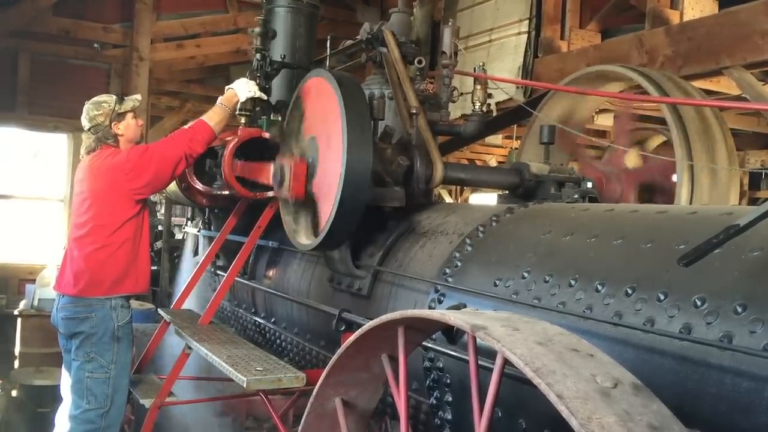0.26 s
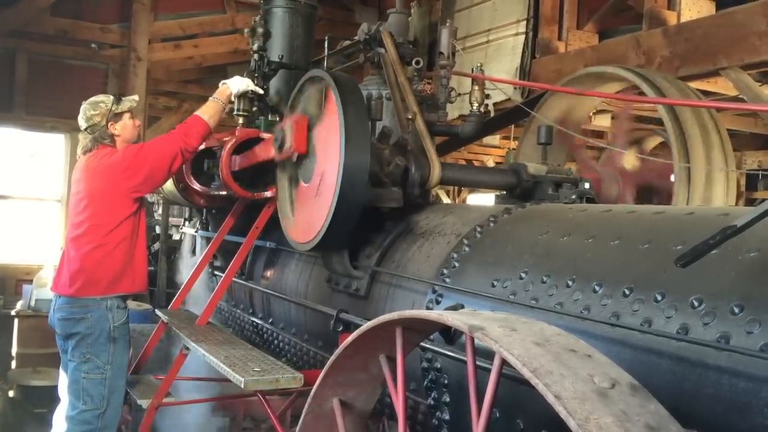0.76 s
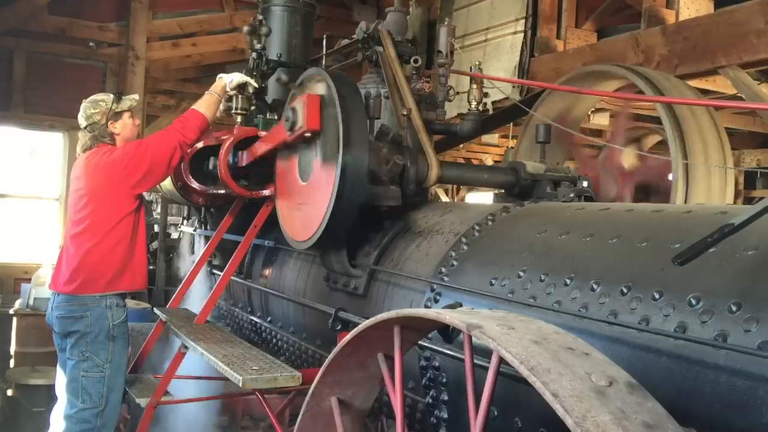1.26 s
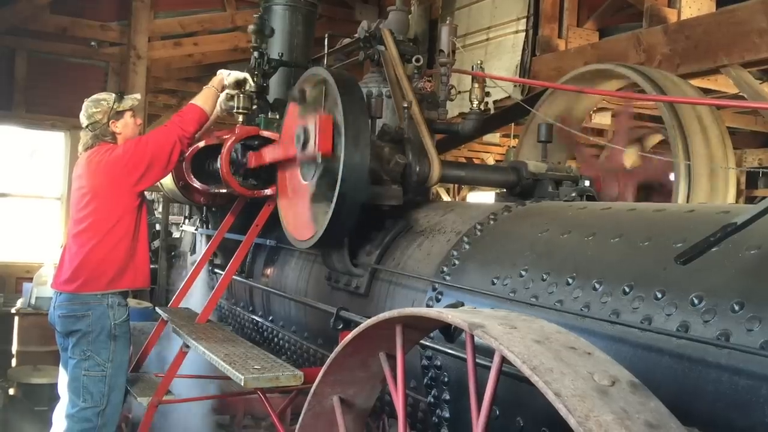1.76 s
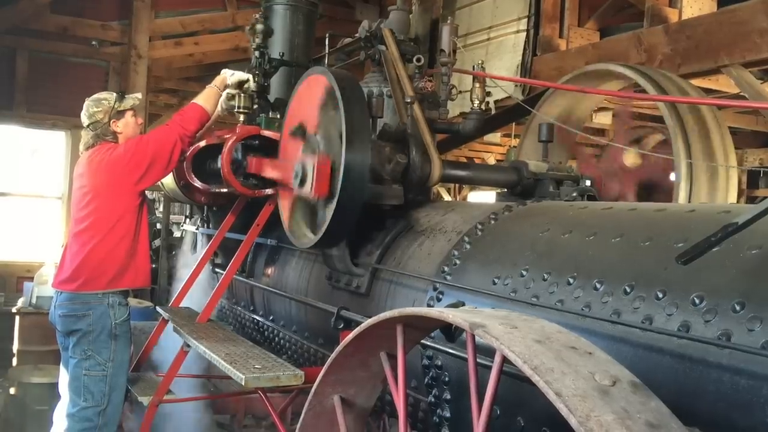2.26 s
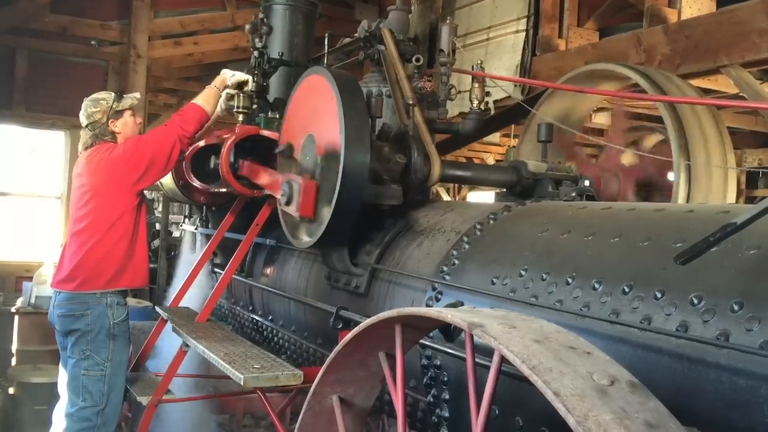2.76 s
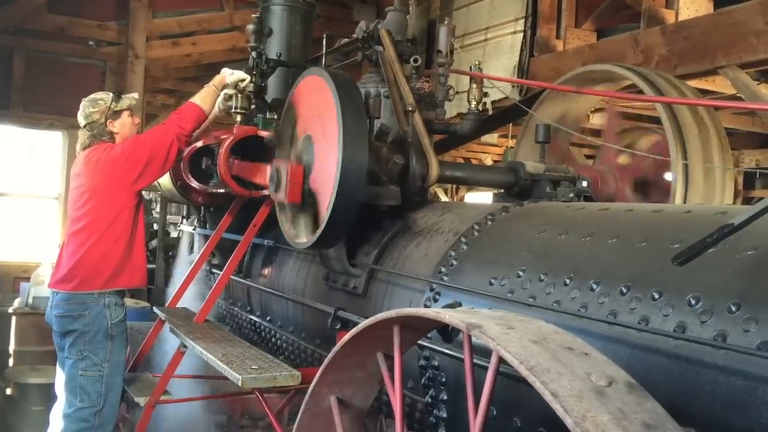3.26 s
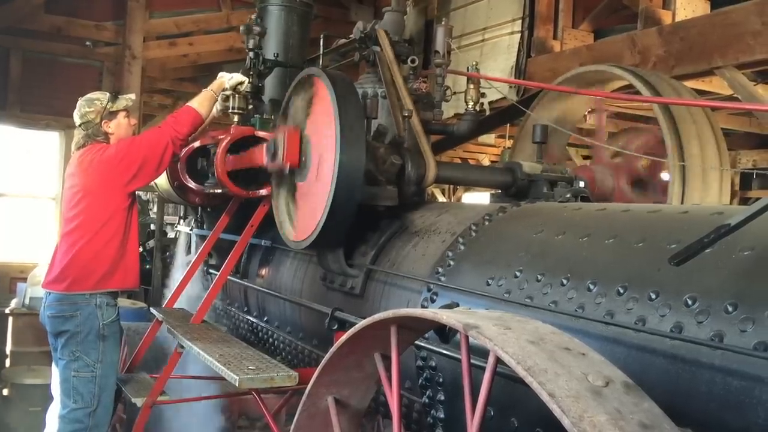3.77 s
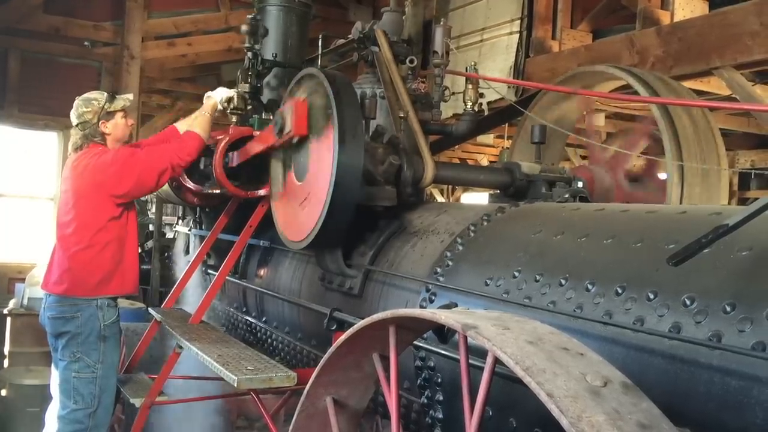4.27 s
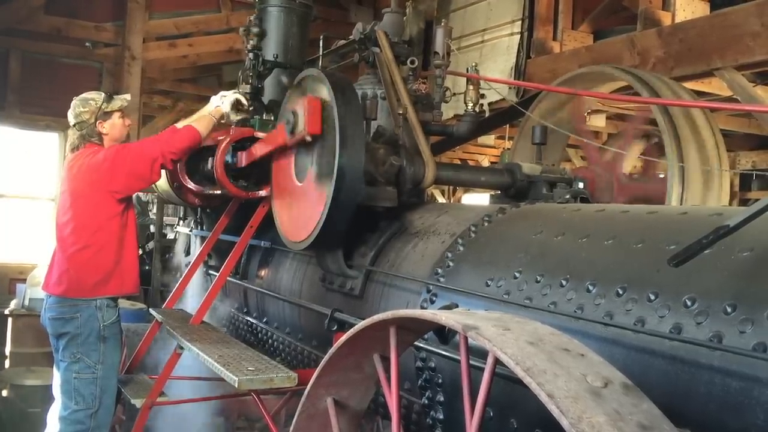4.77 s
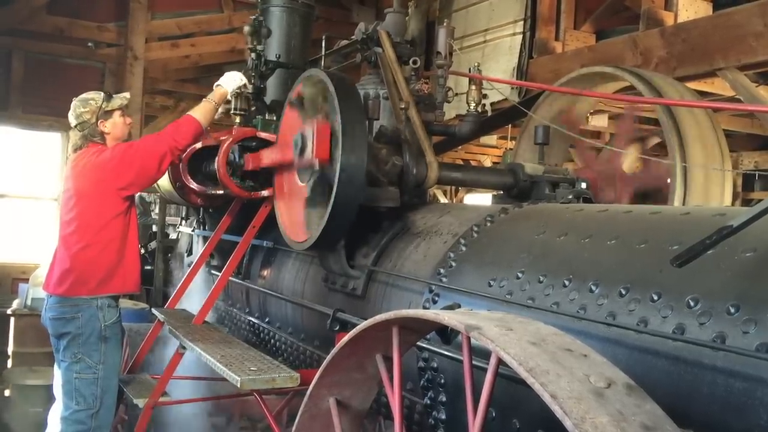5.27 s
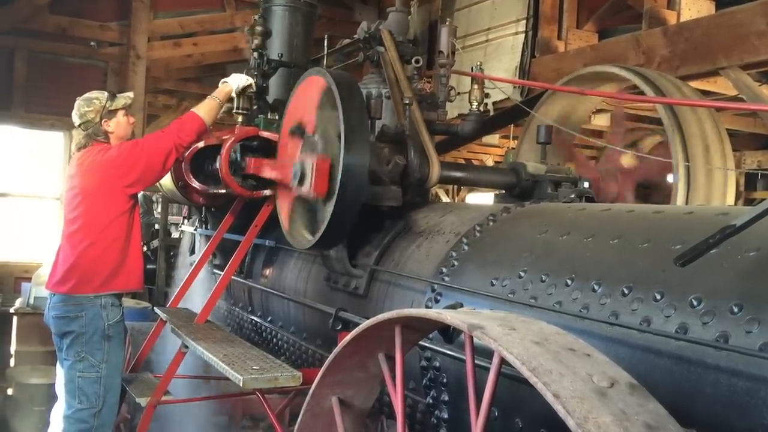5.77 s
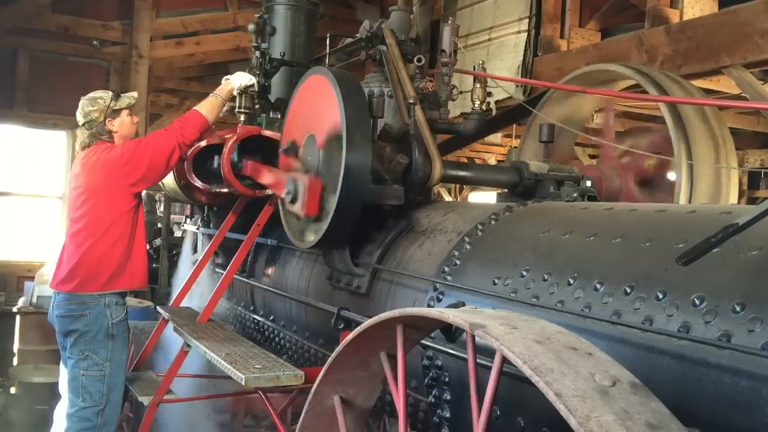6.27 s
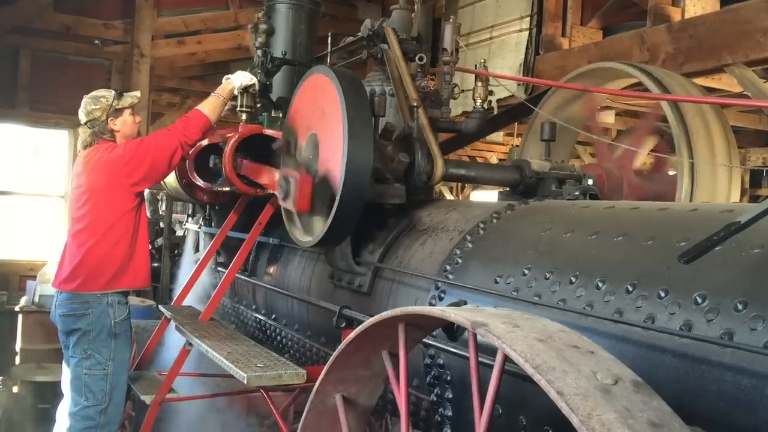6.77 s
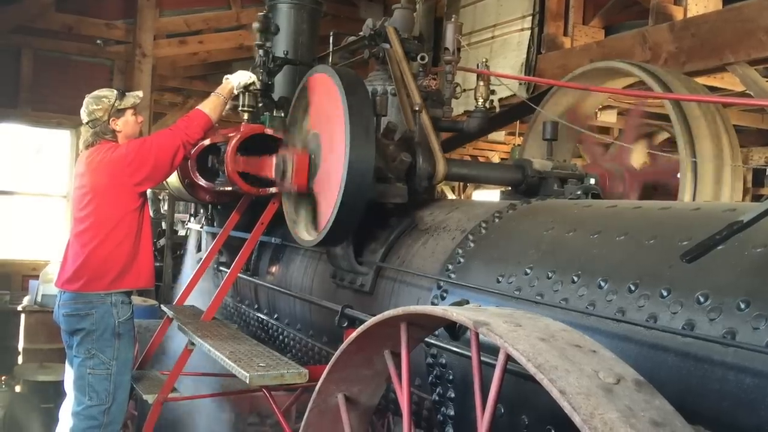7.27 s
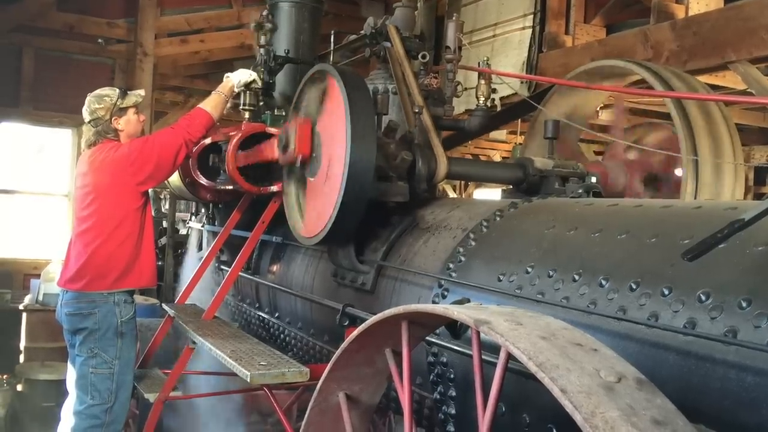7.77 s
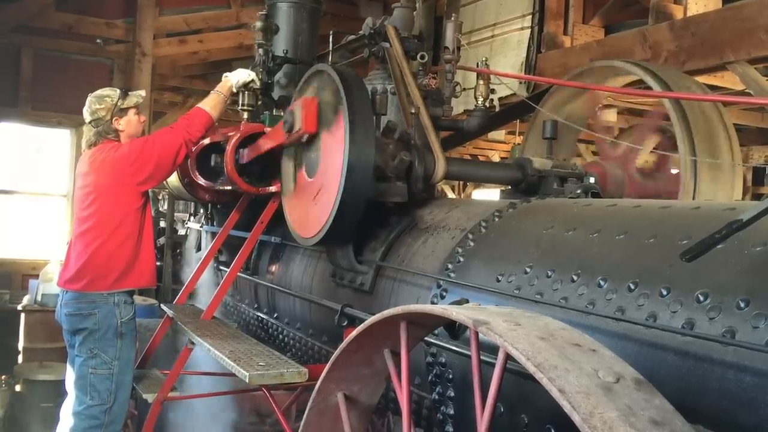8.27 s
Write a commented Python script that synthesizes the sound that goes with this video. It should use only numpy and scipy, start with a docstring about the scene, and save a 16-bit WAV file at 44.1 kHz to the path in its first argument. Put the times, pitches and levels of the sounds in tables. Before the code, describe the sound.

Wet steam bursts in an even two-part beat, short then long, above constant hiss and shaft rumble, with belt drone swelling later.

```python
"""A steam engine idles inside a wooden mill building: leaks hiss and shafts rumble all the time, as coloured noise.
Once a turn each end of the cylinder blows a jet of wet steam, a short sharp one and then a longer one: noise layers
under a moving level and colour, ringing a drain pipe of their own and answered by close echoes and the timber hall.
From about 5 s the low drone of the belt drive swells. One microphone, alike in both channels."""
import sys
import numpy as np
from scipy import signal
from scipy.fft import rfft, irfft, next_fast_len
from scipy.io import wavfile
from scipy.ndimage import uniform_filter1d, map_coordinates

SR = 44100
rng = np.random.default_rng(int(sys.argv[2]) if len(sys.argv) > 2 else 0)


def inscribe(sig):
    """Save sig as 16-bit PCM at rate SR to the path in sys.argv[1].

    A 1-D sig is mono; a 2-D sig holds one channel per row.
    Samples are clipped to [-1, 1] before scaling.
    """
    pcm = np.round(np.clip(np.atleast_2d(sig).T, -1, 1) * 32767)
    wavfile.write(sys.argv[1], SR, pcm.astype(np.int16))


N = 375291

# Course of the mill's steady layers: (time_s, leaks_db, shafts_db, belt_db), rms before their wobble
MILL = [(0, -35.5, -43, -47.5), (1, -38, -42, -46.5), (2, -37, -44.5, -47), (3, -37, -43, -46.5),
        (4, -36.5, -42.5, -49), (4.6, -36, -45, -49), (5.1, -38, -40.5, -41.5), (6, -37.5, -41.5, -41),
        (7, -35, -41, -41), (7.8, -38.5, -43, -40.5), (8.51, -34, -39, -43)]
# Timber frame, rung by shafts and belt: (centre_hz, width_hz, rise_db)
FRAME = [(89.7, 5.6, 6.5), (140, 19, 2), (174, 24, 4), (284, 28, -0.5)]
# Strokes of the two cylinder ends, one row a jet. Hiss levels are set ahead of the drain pipe:
# (opens_s, rise_s, fall_s, peak_db, then hiss against the peak: early_db, late_db, mid_fall_db, dribble_db,
# then layers against the hiss, added to the colour of each stage: roar_db, gurgle_db, fizz_db,
# extra early_fizz_db, extra late_fizz_db, extra early_body_db for both roar and gurgle)
SHORT = [(0.023, 0.084, 0.074, -23.5, -5.5, -1.5, -4, -18, -8.5, -11.5, -4.5, -0.9, 0, 1),
         (0.63, 0.059, 0.1, -23, -1, -2, -3.1, -15.5, -8.5, -12.5, -4, -2.7, -4, -1.3),
         (1.238, 0.059, 0.098, -22, -6.0, -2, -3.5, -15.5, -8.5, -13.5, -4.5, -1.2, 2, 5),
         (1.83, 0.052, 0.112, -22.9, -5.5, -2, -4.5, -18, -8.5, -13, -6, -5, -1.5, 4),
         (2.432, 0.068, 0.088, -24.6, -3, -0.4, -2.5, -18, -8, -10.5, -5, -0.8, -0.3, 3),
         (3.021, 0.07, 0.088, -22, -4, -1.9, -5.1, -23, -9, -13, -5.5, -5, 0.3, 3.5),
         (3.609, 0.062, 0.099, -21.5, -1.5, -1, -3, -20, -9, -13.5, -4.5, -2.0, -0.2, -1.5),
         (4.203, 0.056, 0.089, -25.5, -3.5, -0.6, -3.5, -17, -6.6, -10.6, -4.5, -3.4, -0.5, -2.0),
         (4.779, 0.051, 0.093, -24, -3.5, 0, 0.2, -15, -8.5, -13, -4, -5, 0.0, 1.5),
         (5.342, 0.036, 0.12, -23, -3.8, 1.5, -1.8, -15.5, -6, -13.5, -5.5, 0.1, -3, -3),
         (5.926, 0.059, 0.088, -20.5, -5, -2, -4.5, -15.5, -7.5, -15, -4.5, -1, 1.3, 2),
         (6.494, 0.041, 0.11, -22.5, -2, 0.5, -3.5, -17, -7, -19, -6, 3, -3, -3),
         (7.07, 0.075, 0.081, -22.5, -1.5, -0.5, -5, -17, -10, -12, -5, 2, 1.8, 0.5),
         (7.637, 0.064, 0.076, -22, -4.5, -0.5, -3.8, -16.2, -9.5, -14, -4, -1.1, 2, 4),
         (8.191, 0.063, 0.086, -24, -0.9, 0.5, -2.5, -17, -6.5, -13, -4.5, 5, -1, -2)]
LONG = [(0.27, 0.071, 0.18, -22.5, -8.5, -2, -4, -15.5, -12.1, -15.5, -3.9, -7, -1.1, 5),
        (0.873, 0.085, 0.17, -24, -5.5, -0.3, -2, -10.7, -11, -16.5, -4, -1, -0.8, 1),
        (1.487, 0.082, 0.16, -23.0, -7.5, -0.5, -4, -18.5, -13, -14, -4.5, -9, -0.7, 7),
        (2.062, 0.1, 0.14, -24, -5.6, 1, -3, -12, -10.5, -14.5, -3.5, -0.2, 0.7, 0),
        (2.661, 0.083, 0.17, -23.5, -3.5, -0.5, -4.6, -14, -9.5, -13, -4.5, -1, 0, -2),
        (3.253, 0.095, 0.14, -25, -2, 2, -4, -12, -10, -12.5, -3.5, -1.5, 1.2, 6.5),
        (3.828, 0.11, 0.145, -25, -2, 0, -2.5, -14.5, -9.5, -13, -3.5, 1, -0.2, -2),
        (4.414, 0.11, 0.14, -25, -0.5, 0, -2, -9.5, -11.5, -12.5, -4.5, 3, -3, 1),
        (4.998, 0.079, 0.16, -23, -3, -2.2, -5, -13, -11, -13.5, -4.6, 0.6, -0.4, 0),
        (5.58, 0.081, 0.14, -23.5, -3, -1, -3.5, -11.5, -10.5, -14.6, -5.5, 5, 2.4, -2.4),
        (6.151, 0.101, 0.14, -23, -6, -2.5, -5, -15.5, -11, -14, -5, -2.1, -1.6, 4),
        (6.726, 0.077, 0.15, -24, -6, -2.5, -4.5, -11.5, -10, -13.5, -4.6, -4.0, -0.5, 1),
        (7.295, 0.072, 0.152, -22.5, -5.5, -3.5, -5.5, -11, -11.2, -14, -4, -2.9, 4, -1.1),
        (7.85, 0.083, 0.12, -23.5, -1.5, -1, -3, -11.5, -11, -13.5, -5, 2, 1.4, -5),
        (8.411, 0.098, 0.151, -23.5, -3.8, -0.2, -4.0, -11.0, -12, -19, -3, 0, -0.3, 0)]


def amp(db):
    """Decibels to an amplitude factor."""
    return 10 ** (np.asarray(db) / 20)


def unit(x):
    """x scaled to an rms of 1."""
    return x / np.sqrt(np.mean(x ** 2) + 1e-20)


def along(points, hz):
    """Read (hz, value) points on a log frequency axis."""
    f, v = np.transpose(points)
    return np.interp(np.log(hz + 1), np.log(f + 1), v)


def curves(rows):
    """One value per sample for each column after the time."""
    time_s, *cols = np.transpose(rows)
    return [np.interp(np.arange(N) / SR, time_s, col) for col in cols]


def bumps(modes, hz):
    """Gain of narrow rises or dips laid on a flat response."""
    return amp(sum(db / (1 + (2 * (hz - centre) / width) ** 2) for centre, width, db in modes))


def wobble(rate):
    """A smooth random curve, rate knots a second."""
    knots = rng.standard_normal(int(N * rate / SR) + 4)
    return map_coordinates(knots, [np.arange(N) * rate / SR])


def filtered(x, response):
    """x times a response of frequency."""
    m = next_fast_len(N + 8192)  # padded so that the ringing does not wrap around
    return irfft(rfft(x, m) * response(np.fft.rfftfreq(m, 1 / SR)), m)[..., :N]


def rush(spectrum, patchy_db, modes=()):
    """Turbulent flow: noise of rms 1, patchy in time and pitch, cut an octave outside its spectrum."""
    z = signal.stft(rng.standard_normal(N), nperseg=512)[2]
    patches = uniform_filter1d(rng.standard_normal(z.shape), size=6, axis=0)  # across frequency
    patches = uniform_filter1d(patches, size=8, axis=1)  # across time
    noise = signal.istft(z * amp(patchy_db * unit(patches)), nperseg=512)[1][:N]
    low, high = spectrum[0][0], spectrum[-1][0]

    def colour(hz):
        inside = (hz > low / 2) * (hz < high * 2)
        return amp(along(spectrum, hz)) * bumps(modes, hz) * inside

    return unit(filtered(noise, colour))


def steam_leaks():
    """Steady leaks: patchy, wavering noise that rings the fittings around it."""
    # Noise colour: (frequency_hz, relative_db)
    leak_spectrum = [(240, -20), (400, 2.5), (500, -8.5), (700, 0), (1000, -3), (1540, -4.5), (4000, -1.5),
                     (6500, -5.5), (10000, -17), (16000, -14.5)]
    # Fittings rung by the leaks: (centre_hz, width_hz, rise_db)
    fitting_modes = [(730, 24, 2), (900, 42, 7.5), (1008, 52, 5.5), (1317, 43, 1), (1670, 54, 0)]
    level_db = curves(MILL)[0] + 1.9 * wobble(6.8)
    return amp(level_db) * rush(leak_spectrum, patchy_db=3.0, modes=fitting_modes)


def shaft_rumble():
    """Turning shafts: low wavering noise through the resonances of the timber frame."""
    # Noise colour: (frequency_hz, relative_db)
    shaft_spectrum = [(15, -42), (25, -9), (86, 1), (112, -1), (179, -7.5), (253, -5), (285, -1.5),
                      (479, -16), (600, -9.5), (780, -45), (1320, -120)]
    level_db = curves(MILL)[1] + 1.1 * wobble(5)
    return amp(level_db) * rush(shaft_spectrum, patchy_db=1.5, modes=FRAME)


def belt_drone():
    """Belt drive: a low band of noise through the same frame, swelling at about 5 s."""
    # Noise colour: (frequency_hz, relative_db)
    belt_spectrum = [(50, -32), (90, -11), (140, 2), (200, 1), (300, -4.5), (450, -15.5)]
    level_db = curves(MILL)[2] + 0.83 * wobble(5.7)
    return amp(level_db) * rush(belt_spectrum, patchy_db=1.0, modes=FRAME)


def stroke_points(strokes, other, colour, dribble_s, fade_db):
    """Nine stages a stroke as (time_s, hiss_db, roar_db, gurgle_db, fizz_db), with -80 dB hiss on both sides.

    The dribble lasts until the other drain opens and loses fade_db on the way."""
    crack_s = 0.022  # the drain cracks open this long before it opens
    early_at, late_at, mid_fall_at = 0.24, 0.72, 0.59  # shares of the rise, the rise and the fall
    crack_db, open_db, shut_db = -47.5, -30.5, -31.5  # hiss at these stages
    rows = []
    for stroke in strokes:
        opens, rise, fall, peak_db, early_db, late_db, mid_fall_db, dribble_db = stroke[:8]
        roar_db, gurgle_db, fizz_db, early_fizz_db, late_fizz_db, early_body_db = stroke[8:]
        peaks = opens + rise
        shuts = opens + rise + fall
        dribbles = shuts + dribble_s
        other_opens = min([row[0] for row in other if row[0] > opens], default=shuts + 1)
        ends = max(other_opens, dribbles + 0.005)
        time_s = [opens - crack_s, opens, opens + early_at * rise, opens + late_at * rise, peaks,
                  peaks + mid_fall_at * fall, shuts, dribbles, ends]
        hiss_db = [crack_db, open_db, peak_db + early_db, peak_db + late_db, peak_db,
                   peak_db + mid_fall_db, shut_db, peak_db + dribble_db, peak_db + dribble_db + fade_db]
        mix_db = np.add(colour, [roar_db, gurgle_db, fizz_db])
        mix_db[2] += [early_body_db, early_body_db, early_fizz_db]
        mix_db[3, 2] += late_fizz_db
        rows.append((time_s[0] - 0.012, -80, 0, 0, 0))
        rows.extend(np.column_stack([time_s, hiss_db, mix_db]))
        rows.append((ends + 0.0071, -80, 0, 0, 0))
    return rows


def nearby(x, echo_db, t60):
    """Boiler, wheels and floor send back close echoes, the same for every puff: a fine ripple in the colour."""
    t = np.arange(SR // 10) / SR
    echoes = rng.standard_normal(len(t)) * amp(-60 * t / t60) * (t > 0.002)
    path = amp(echo_db) * echoes / np.linalg.norm(echoes)
    path[0] = 1  # direct sound
    return signal.fftconvolve(x, path / np.linalg.norm(path))[:N]


def jet(rows, hiss_spectrum, roar_spectrum, pipe_modes, pipe_db):
    """Wet steam from one drain: drops of water make the flow sputter, most of all in the fizz; the pipe rings."""
    # Noise colour of the bubbling low layer: (frequency_hz, relative_db)
    gurgle_spectrum = [(400, -9), (620, -1.5), (780, -3), (950, -2), (1300, -1), (1800, -21.5)]
    # Noise colour of the top layer: (frequency_hz, relative_db)
    fizz_spectrum = [(7500, -25), (9500, 0), (11300, 1), (12500, -1), (14000, -.5), (16000, -1.5)]
    hiss_db, roar_db, gurgle_db, fizz_db = curves(rows)
    sputter_db = 0.6 * (wobble(25) + 1.18 * wobble(70) + 0.49 * wobble(400))
    hiss = amp(hiss_db + sputter_db) * rush(hiss_spectrum, patchy_db=0.3)
    roar = amp(hiss_db + roar_db + 0.65 * sputter_db) * rush(roar_spectrum, patchy_db=1.2)
    gurgle = amp(hiss_db + gurgle_db + wobble(30)) * rush(gurgle_spectrum, patchy_db=1.7)
    fizz = amp(hiss_db + fizz_db + 1.63 * sputter_db) * rush(fizz_spectrum, patchy_db=0.3)
    # The power of 1.2 deepens every pipe resonance by a fifth in dB; the fizz bypasses the pipe
    rung = filtered(hiss + roar + gurgle, lambda hz: amp(pipe_db) * bumps(pipe_modes, hz) ** 1.2)
    return nearby(rung + fizz, echo_db=-9, t60=0.13)


def short_jets():
    """The short sharp jets of one cylinder end, through their drain pipe."""
    # Noise colours of hiss and roar: (frequency_hz, relative_db)
    short_hiss = [(1800, -25), (2400, -5), (3200, -5.5), (3900, 0), (4500, -1), (5600, -3.5), (6500, -3),
                  (8500, -1.5), (9500, -3), (11000, -12.5)]
    short_roar = [(1000, -15), (1450, -3), (1900, -3), (2300, -7), (3200, -13.5)]
    # Drain pipe resonances: (centre_hz, width_hz, rise_db before the jet deepens it)
    short_pipe = [(975, 120, 5.0), (1289, 140, 5.0), (1688, 70, 5.0), (1938, 80, 6.0), (2113, 50, 6.0),
                  (2263, 40, 6.0), (2415, 150, 6.0), (2673, 80, 8.0), (2940, 160, 6.0), (3244, 160, 8.0),
                  (3611, 70, 8.0), (3938, 60, 7.0), (4482, 160, 5.0), (4665, 60, 4.0), (5175, 120, 4.0),
                  (5499, 160, 5.0), (5699, 160, 5.0), (5904, 100, 5.0), (6424, 160, 4.0), (6561, 40, 4.0),
                  (6734, 90, 7.0), (7270, 90, 5.0), (7587, 110, 5.0), (8119, 50, 3.0), (8523, 110, 4.0),
                  (8734, 80, 5.0), (8976, 70, 4.0), (9379, 60, 3.0), (9758, 50, 4.0), (9949, 70, 4.0)]
    # Layers against the hiss at crack, open, early rise, late rise, peak, mid-fall, shut, dribble, end,
    # ahead of each stroke's own offsets: (roar_db, gurgle_db, fizz_db)
    short_colour = [(10, 8, 0.1), (0, 7.5, 0), (2, 5.5, 0.7), (-0.7, -0.3, 2.5), (0, -1.5, 3.5),
                    (-0.5, -0.5, 2.5), (1.2, -0.5, 0), (3, 7, 0), (3, 11, -1)]
    rows = stroke_points(SHORT, LONG, short_colour, dribble_s=0.026, fade_db=-9)
    return jet(rows, short_hiss, short_roar, short_pipe, pipe_db=-3.0)


def long_jets():
    """The longer jets of the other cylinder end, through a second drain pipe."""
    # Noise colours of hiss and roar: (frequency_hz, relative_db)
    long_hiss = [(1800, -38), (2400, -11), (3200, -3.5), (3900, -1.5), (4500, -2), (5600, -4), (6500, -2),
                 (8500, -3.5), (9500, -2.5), (11000, -14)]
    long_roar = [(1000, -14), (1450, -3), (1900, -3.5), (2300, -3.5), (3200, -13)]
    # Drain pipe resonances: (centre_hz, width_hz, rise_db before the jet deepens it)
    long_pipe = [(998, 90, 3.0), (1427, 80, 4.0), (1753, 130, 9.0), (1971, 60, 6.0), (2178, 160, 6.0),
                 (2464, 160, 5.0), (2597, 60, 8.0), (2747, 50, 6.0), (3002, 40, 5.0), (3239, 70, 6.0),
                 (3601, 60, 8.0), (3973, 60, 4.0), (4238, 40, 4.0), (4536, 60, 5.0), (4716, 90, 6.0),
                 (5214, 150, 5.0), (5527, 160, 7.0), (5864, 50, 3.0), (6399, 130, 5.0), (6683, 80, 7.0),
                 (6941, 40, 4.0), (7206, 160, 3.0), (7517, 80, 4.0), (7755, 120, 4.0), (8106, 70, 6.0),
                 (8350, 60, 4.0), (8629, 70, 6.0), (8948, 70, 4.0), (9181, 70, 5.0), (9784, 150, 4.0)]
    # Layers against the hiss at the same nine stages, ahead of the offsets: (roar_db, gurgle_db, fizz_db)
    long_colour = [(10, 12, -2), (-3.5, -2.5, 4), (-2.5, -2, 0.5), (-2, 2, -0.3), (-2.5, -3.5, 5),
                   (-3.5, 0.8, 2), (-3, 2, 2.5), (0, 7, 2.5), (6.5, 13.5, 2.5)]
    rows = stroke_points(LONG, SHORT, long_colour, dribble_s=0.025, fade_db=-3.7)
    return jet(rows, long_hiss, long_roar, long_pipe, pipe_db=-2.5)


def hall(x):
    """Each frequency of the hall's answer dies at its own speed; a new tail every third of a second."""
    # Decay of the timber hall: (frequency_hz, t60_s)
    hall_decay = [(300, 0.27), (2000, 0.27), (6000, 0.26), (14000, 0.076)]
    wet, step = np.zeros(N + 2 * SR), SR // 3
    delay = 600  # samples before the answer starts
    for start in range(0, N, step):
        hz, t, z = signal.stft(rng.standard_normal(SR // 2), SR, nperseg=256)
        decay = amp(-60 * t / along(hall_decay, hz)[:, None])
        tail = signal.istft(z * decay, SR, nperseg=256)[1]
        part = signal.fftconvolve(x[start:start + step], tail / np.linalg.norm(tail))
        wet[start + delay:][:len(part)] += part
    return wet[:N]


def scene():
    """Both jets with the hall's answer over the steady mill, alike in both channels."""
    steady = steam_leaks() + shaft_rumble() + belt_drone()
    jets = short_jets() + long_jets()
    return np.tile(jets + amp(-16.0) * hall(jets) + steady, (2, 1))


def record(dry):
    """The microphone housing dents the treble twice; nothing is kept above the band limit."""
    # Dips from the housing: (centre_hz, width_hz, dip_db)
    housing_dips = [(4950, 400, -4.5), (10330, 300, -7)]
    top_hz = 15750
    return filtered(dry, lambda hz: bumps(housing_dips, hz) * (hz < top_hz))


dry = scene()
out = record(dry)
inscribe(out)
```